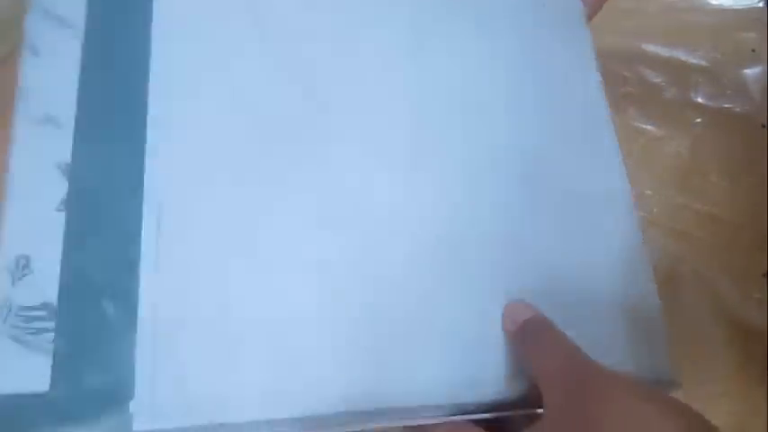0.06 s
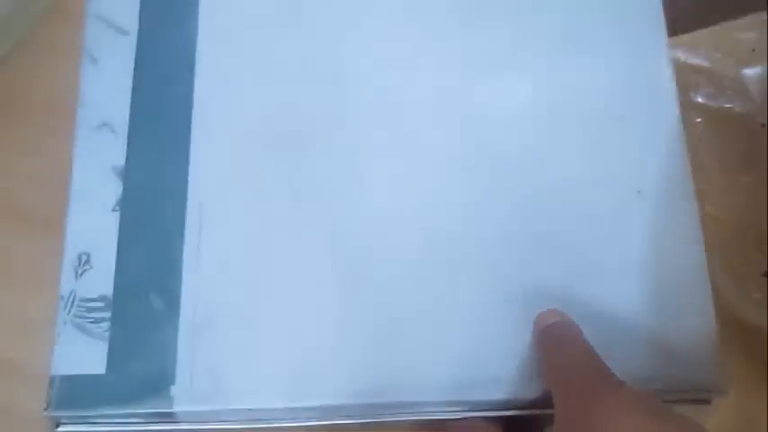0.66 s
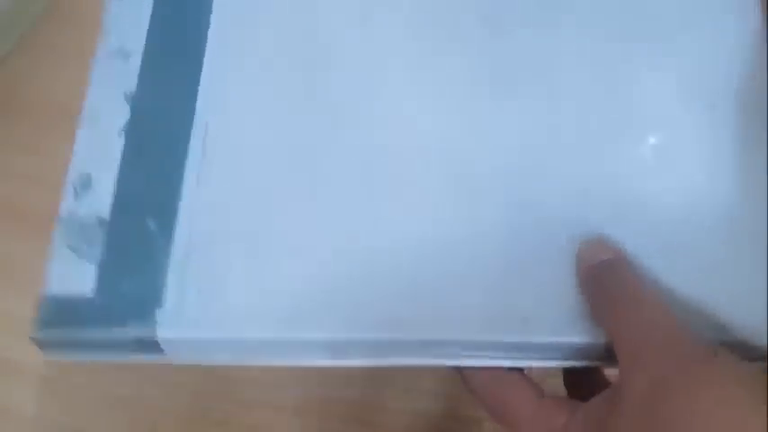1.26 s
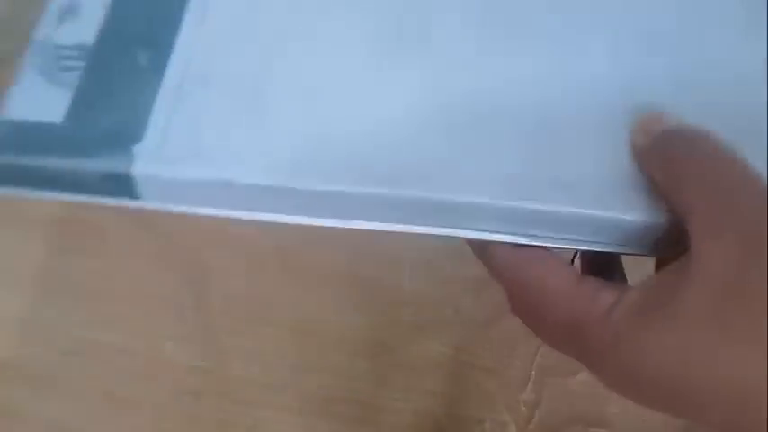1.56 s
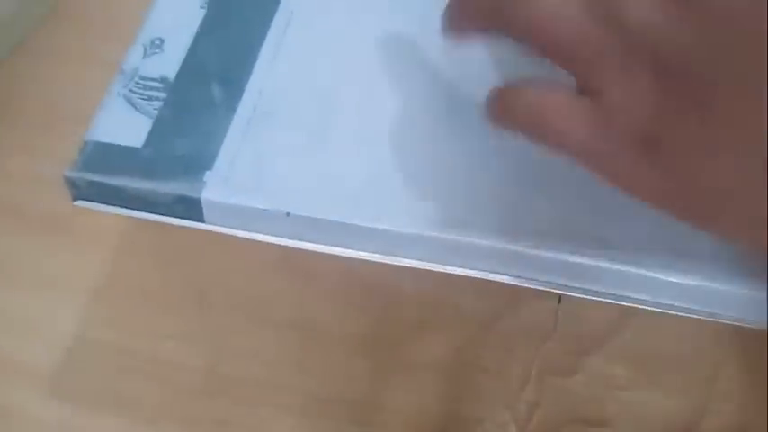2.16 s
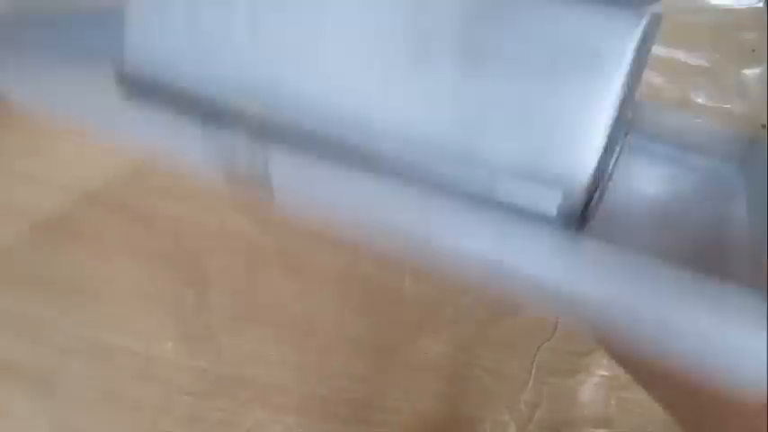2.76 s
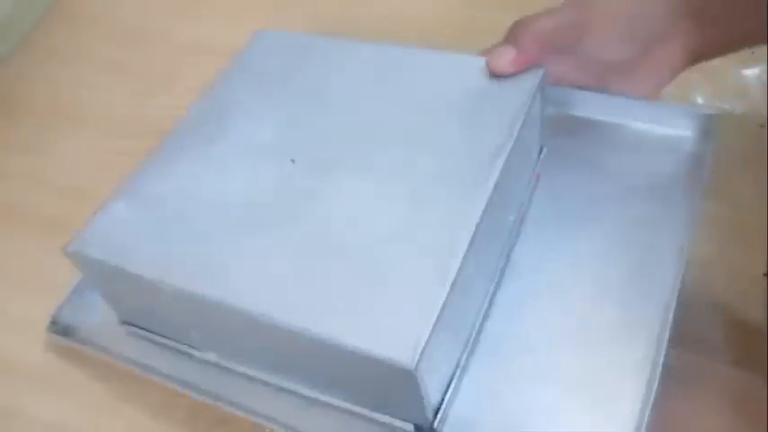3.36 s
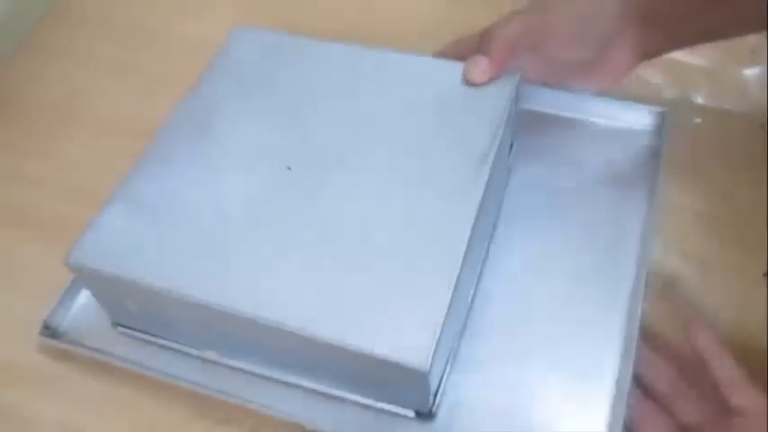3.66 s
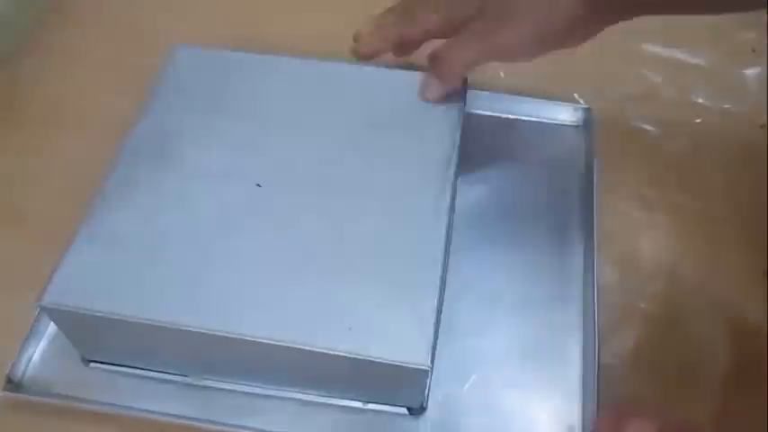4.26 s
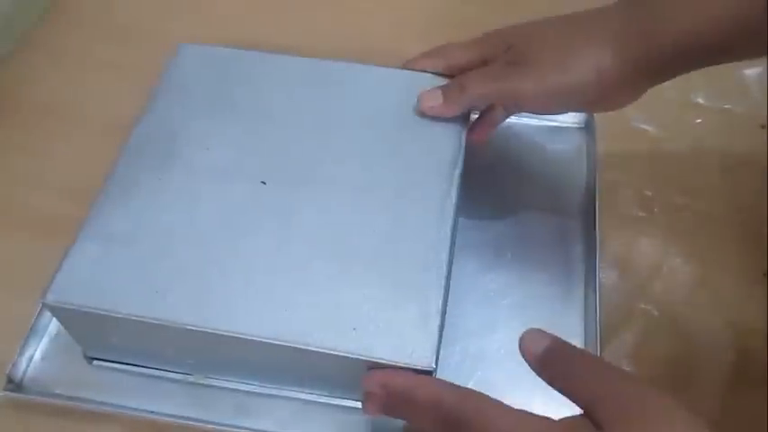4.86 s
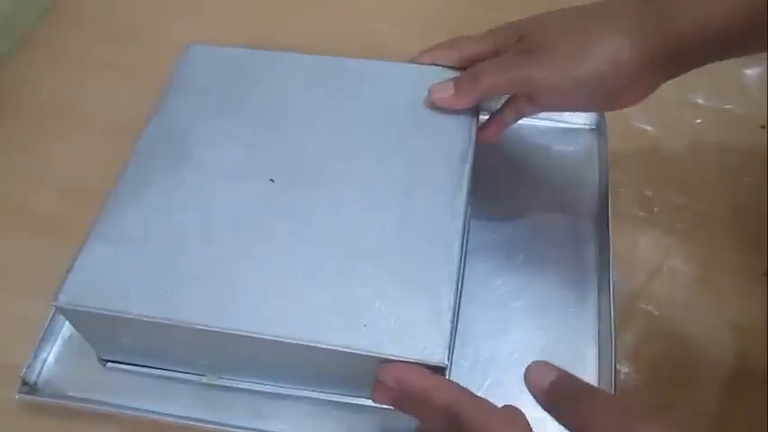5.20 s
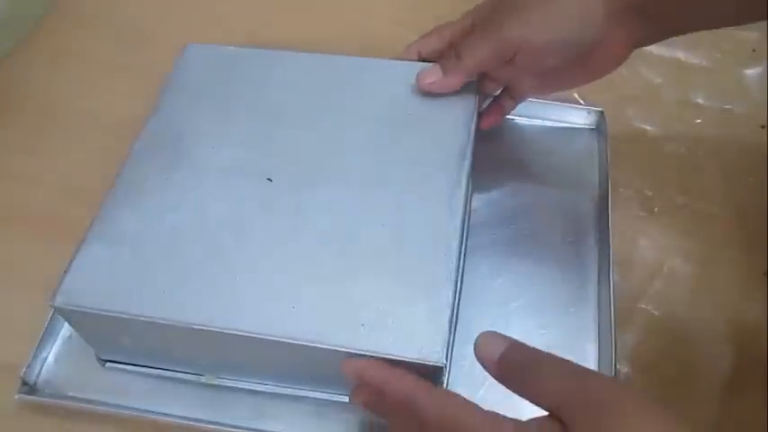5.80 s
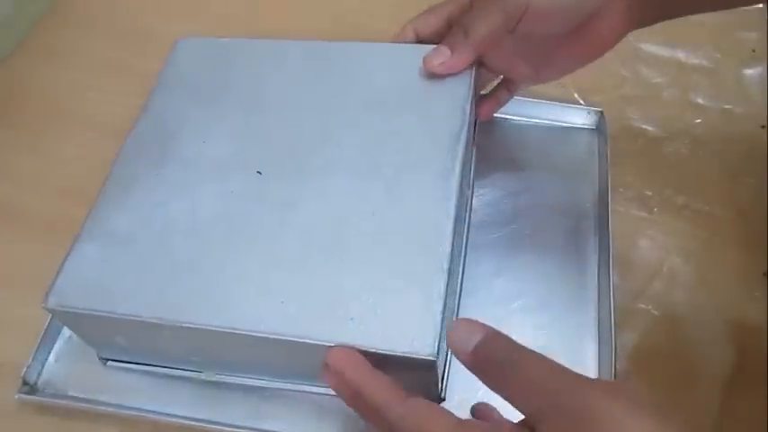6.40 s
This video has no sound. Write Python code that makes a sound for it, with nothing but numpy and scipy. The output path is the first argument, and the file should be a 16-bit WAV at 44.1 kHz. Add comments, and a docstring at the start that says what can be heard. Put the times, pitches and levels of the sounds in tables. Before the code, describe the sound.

Close knocks, clatter and scraping of an aluminium tin being turned over onto a metal tray, with a low hum behind.

```python
"""Baking tin on a tray

An aluminium baking tin is handled on a thin tray, turned over and set down on it, on a kitchen table.
Close to the microphone, the sheet metal clanks and rattles when knocked, booms when pushed and scrapes
as it slides, over the low hum of the room. A limiter ducks on the loudest knocks and lets the hum
creep back."""
import sys
import numpy as np
from scipy import signal
from scipy.fft import rfft, irfft
from scipy.io import wavfile
from scipy.ndimage import uniform_filter1d

SR = 44100
rng = np.random.default_rng(int(sys.argv[2]) if len(sys.argv) > 2 else 0)


def transcribe(signal):
    """Save signal, clipped to [-1, 1], as a 16-bit WAV file at the path in sys.argv[1]."""
    frames = np.atleast_2d(signal).T
    limited = np.clip(frames, -1, 1)
    pcm = np.round(limited * 32767).astype(np.int16)
    wavfile.write(sys.argv[1], SR, pcm)


N = 292824
TIME = np.arange(N) / SR
HELD_T60_S = .25  # in the hands the sheet rings freely

# The ring of tin and tray. Each row: mode in Hz, relative level in dB, t60 in seconds before damping.
SHEET_MODES = [(164, 9, 0.38), (217.2, 3, 0.24), (282, -3.5, 0.61), (340.2, -4.5, 1), (431.4, -0.5, 1),
               (473.7, -5, 0.33), (504.4, 4.5, 0.24), (545, -2, 0.29), (609.5, 2, 0.23), (728, 0.5, 0.47),
               (796, -7, 0.35), (884, -19, 0.25), (1132, -3.5, 0.27), (1207, 0, 0.21), (1302, -2.5, 0.2),
               (1410, 5, 0.089), (1600, 7, 0.1), (1600, -5, 0.053), (1752, -11.5, 0.23), (1900, -15, 0.17)]
# The ping of the folded rim. Each row: mode in Hz, relative level in dB, t60 in seconds before damping.
RIM_MODES = [(2380, -8, 0.38), (2660, 1, 0.36), (2750, -18.5, 0.27), (3200, -34, 0.26), (3270, 8, .25),
             (3860, 9, 0.7), (4340, -16, 0.15), (4460, -14, 0.13), (5300, 7, 0.18), (6400, 2, 0.18),
             (7850, -12, 0.14)]
# The bright tone of an edge contact. Each row: frequency in Hz, relative level in dB.
CLICK_SPECTRUM = [(600, -11), (1500, 6.5), (2500, -0.5), (4000, 0.5), (5500, -5.5), (8000, -6),
                  (10500, -13), (13500, -15.5), (16000, -59)]
# The dull tone of rubbed sheet. Each row: frequency in Hz, relative level in dB.
RUB_SPECTRUM = [(25, -8), (55, 6), (85, -6), (160, 1), (270, 0), (480, 3.5), (750, 3), (1000, -3.5),
                (1500, -19), (2200, -20), (5000, -107)]


def amp(db):
    """Decibels as a gain."""
    return 10 ** (np.asarray(db) / 20)


def unit(x):
    """Scales x to rms 1."""
    return x / np.sqrt(np.mean(x ** 2) + 1e-20)


def curve_at(points, hz):
    """Reads a curve along a log frequency axis."""
    f, value = np.transpose(points)
    return np.interp(np.log(hz + 1), np.log(f + 1), value)


def add(mix, start_s, sound):
    """Lays a sound into the mix."""
    part = mix[max(round(start_s * SR), 0):][:len(sound)]
    part += sound[:len(part)]


def hump(hz, centre_hz, octaves):
    """A bell of gain, halved this many octaves from its centre."""
    return 1 / (1 + (np.log2((hz + 1) / centre_hz) / octaves) ** 2)


def colour(x, points, centre_hz=None, octaves=1):
    """Gives x a spectrum, and if asked a broad hump around one frequency; rms 1."""
    hz = np.fft.rfftfreq(len(x), 1 / SR)
    gain = amp(curve_at(points, hz))
    if centre_hz:
        gain = gain * hump(hz, centre_hz, octaves)
    return unit(irfft(rfft(x) * gain, len(x)))


def wander(below_hz):
    """Smooth random drift of rms 1."""
    hz = np.fft.rfftfreq(N, 1 / SR)
    return unit(irfft(rfft(rng.standard_normal(N)) * (hz < below_hz), N))


def decay(t, t60):
    """A fade of 60 dB every t60 seconds."""
    return np.exp(-np.log(1000) * t / np.maximum(t60, 1e-3))


def struck(x, db, first_s):
    """Sets the rms level of the first moments of a blow."""
    return x * amp(db) / np.sqrt(np.mean(x[:int(first_s * SR) + 1] ** 2) + 1e-20)


def swells(starts, rises, lengths, levels_db, t60):
    """Gain of a series of movements: each eases in, holds and dies away."""
    power = np.zeros(N)
    for start, rise_s, length, db in np.broadcast(starts, rises, lengths, levels_db):
        rise = np.sin(np.pi / 2 * np.clip((TIME - start) / rise_s, 0, 1)) ** 2
        power += (amp(db) * rise * decay(np.maximum(TIME - start - length, 0), t60)) ** 2
    return np.sqrt(power)


def ring(t, modes, damping_t60, centre_hz=None, octaves=1, uneven_db=3.0, detune=0.02):
    """Modes rung by one blow; the spot struck sets their shares, the grip bends and damps them."""
    hz, db, t60 = np.transpose(modes)[:, :, None]
    share, bend, phase = rng.standard_normal((3, len(modes), 1))
    gain = amp(db + uneven_db * share) * (hump(hz, centre_hz, octaves) if centre_hz else 1)
    waves = gain * np.sin(2 * np.pi * (hz * (1 + detune * bend) * t + phase)) * decay(t, t60)
    return waves.sum(0) * decay(t, damping_t60) / np.sqrt(np.sum(gain ** 2) / 2)


def room_hum(air_db=-35.5):
    """A bed of room noise with the wavering tones of a running appliance."""
    # The low wash of the room. Each row: frequency in Hz, relative level in dB.
    air_spectrum = [(20, -1.5), (45, -5), (75, -4.5), (115, -1.5), (165, -2.5), (210, -2), (290, -12),
                    (560, -12.5), (760, -19.5), (1080, -17.5), (1400, -24), (2100, -24.5), (4000, -33),
                    (8500, -39), (12000, -46), (16000, -55)]
    # The appliance's tones. Each row: pitch in Hz, rms level in dB around which it wavers.
    hum_tones = [(151, -44), (178, -52.5), (247, -57.5), (344, -50.5), (539, -52.5), (597, -54.5),
                 (1044, -55.5), (1168, -61.5), (11795, -79)]
    air = amp(air_db) * colour(rng.standard_normal(N), air_spectrum) * amp(0.19 * wander(1.7))
    tones = np.zeros(N)
    for hz, db in hum_tones:
        level = amp(db) * (1 + 0.36 * wander(6.8))
        tones += level * np.sin(2 * np.pi * hz * TIME + 1.16 * wander(9))
    return air + np.sqrt(2) * tones


def catches(per_s, spread_db, fade):
    """Grains catch at random: spikes of uneven strength, each dying along the fade."""
    spikes = (rng.random(N) < per_s / SR) * amp(spread_db * np.minimum(rng.exponential(1, N), 3))
    return signal.fftconvolve(spikes, fade)[:N]


def scrape(rim_db=-22, tick_db=-24, release_t60=0.3):
    """Tiny slips drive the sheet's resonances and hiss at the contact; catching grains tick the rim."""
    # Metal slides on metal and under the hands. Each row: start, rise and length in seconds,
    # sheet level in dB, hiss level in dB.
    strokes = [(.0, 0.017, 0.31, -39.5, -46.5), (0.745, 0.03, 0.27, -35.5, -48.5),
               (1.232, 0.051, 0.16, -32, -69), (2.387, 0.05, 0.096, -34, -67),
               (2.486, 0.044, 0.17, -27.5, -29), (3.107, 0.12, 0.15, -19.5, -21.5),
               (3.32, 0.032, .2, -20, -36.5), (3.554, 0.028, 0.11, -48, -36.5),
               (3.675, 0.085, 0.18, -28, -40), (3.87, 0.073, 0.1, -32.5, -41.5),
               (3.997, 0.6, 0.15, -58, -16)]
    starts, rises, lengths, sheet_db, hiss_db = np.transpose(strokes)
    t = np.arange(SR // 3) / SR
    grit = catches(per_s=70, spread_db=1.13, fade=decay(t[:SR // 50], 0.0063))
    slips = rng.standard_normal(N) * (amp(0.68 * wander(280) + 1.7 * wander(25)) + 0.47 * grit)
    sheet_ring = ring(t, SHEET_MODES, 0.13, centre_hz=930, octaves=0.64, uneven_db=8.0, detune=0.0012)
    rim_ring = ring(t, RIM_MODES, 0.17, uneven_db=-2.0, detune=0.0024)
    singing = unit(signal.fftconvolve(slips, sheet_ring)[:N])
    rim = unit(signal.fftconvolve(slips, rim_ring)[:N])
    snags = catches(per_s=45, spread_db=3, fade=decay(t, 0.03))
    ticks = colour(rng.standard_normal(N) * snags, CLICK_SPECTRUM)
    sheet = unit(colour(slips, RUB_SPECTRUM) + amp(-9) * singing) + amp(rim_db) * rim + amp(tick_db) * ticks
    # The bright top of the slide. Each row: frequency in Hz, relative level in dB.
    hiss_spectrum = [(500, -1), (1500, 5), (2500, 0.5), (4200, 0), (6000, -4.5), (8000, -5), (10500, -11.5),
                     (13500, -13), (16000, -24)]
    return (sheet * swells(starts, rises, lengths, sheet_db, release_t60)
            + colour(slips, hiss_spectrum) * swells(starts, rises, lengths, hiss_db, release_t60))


def tray_sway(hz=54, octave_db=-12, rise_s=0.037, release_t60=0.22):
    """The wide tray flaps in its lowest mode; the bent sheet adds the octave."""
    # Jolts and changes of grip. Each row: start in seconds, length in seconds, level in dB.
    jolts = [(0.046, 0.12, -19.5), (0.657, 0.036, -19.5), (0.771, 0.11, -25), (0.982, 0.18, -32),
             (3.318, 0.035, -12), (3.544, .06, -20), (3.78, 0.12, -36), (5.68, 0.032, -32),
             (6.357, .05, -33.5)]
    starts, lengths, levels_db = np.transpose(jolts)
    phase = 2 * np.pi * hz * TIME + .5 * wander(6)
    flap = unit(np.sin(phase) + amp(octave_db) * np.sin(2 * phase + wander(6)))
    return swells(starts, rise_s, lengths, levels_db, release_t60) * flap


def edge_click(t, t60, attack_s):
    """The first contact is sharp; the loose rim then buzzes unevenly while the sheet moves."""
    noise, slack = rng.standard_normal((2, len(t)))
    chatter = amp(3.7 * unit(uniform_filter1d(slack, size=110)))
    click = colour(noise, CLICK_SPECTRUM) * (decay(t, 0.028) + amp(-6.5) * chatter * decay(t, 0.8 * t60))
    ping = amp(-11.5) * ring(t, RIM_MODES, 0.73 * t60, detune=0.0016)
    return (click + ping) * (1 - decay(t, 0.73 * attack_s))


def knock(clank_db, centre_hz, thump_db, click_db, t60, attack_s):
    """One blow: the sheet clanks, its flat bottom thumps, and the rim clicks and chatters."""
    # The clank's body and the thump's weight. Each row: frequency in Hz, relative level in dB.
    clank_spectrum = [(100, -21), (200, -4.5), (450, 3), (750, 0.5), (1000, -3), (1500, -8.5), (2000, -9),
                      (3000, -9.5), (6000, -11)]
    thump_spectrum = [(15, -18), (30, 1), (55, 8), (80, -20), (130, 0.5), (220, 6), (400, -14), (1000, -89)]
    # The wide bottom flexes. Each row: mode in Hz, relative level in dB, t60 in seconds before damping.
    flex_modes = [(54.8, 1, 1), (102.2, -3, 0.54), (171, 0.5, 0.24)]
    t = np.arange(SR // 2) / SR
    clank_noise, thump_noise = rng.standard_normal((2, len(t)))
    # a few strong modes stand out of the dense ring of the thin sheet
    dense = colour(clank_noise, clank_spectrum, centre_hz, octaves=0.83) * decay(t, t60)
    clank = dense + amp(-3) * ring(t, SHEET_MODES, 2.2 * t60, centre_hz, detune=.004)
    thump = colour(thump_noise, thump_spectrum) * decay(t, 0.11) + amp(-7.5) * ring(t, flex_modes, 0.49)
    return (struck(clank * (1 - decay(t, attack_s)), clank_db, first_s=0.014)
            + struck(thump * (1 - decay(t, 0.056)), thump_db, first_s=0.059)
            + struck(edge_click(t, t60, attack_s), click_db, first_s=0.006))


def clatter(rebounds=4, gap_s=.026, scatter=.25, rebound_attack_s=0.0021):
    """Tin and tray knock together in the hands, and the loose tin rattles on in fading rebounds."""
    # Each row is a knock: start in seconds, clank in dB, clank centre in Hz, thump in dB, click in dB,
    # clank attack in seconds, gain of the rebounds in dB.
    knocks = [(.089, -18, 696, -21.5, -28.5, 0.017, -3), (.36, -6.5, 846, -27.5, -13, 0.0012, 2.5),
              (.648, -25, 624, -37, -35, 0.027, -14), (.664, -13, 640, -25.5, -25, 0.0054, -28),
              (.682, -12, 634, -33, -21, 0.0031, -13), (.866, -16, 670, -24.5, -27.5, 0.064, 2),
              (1.03, -25.5, 576, -32.5, -35, 0.0042, 1), (1.269, -25.5, 465, -42, -37.5, 0.023, -0.5),
              (1.35, -24.5, 685, -37.5, -31, 0.0014, 4), (1.635, -27, 400, -30, -35, 0.0033, -8),
              (1.667, -14, 617, -24, -19.5, 0.004, -10), (1.674, -15.5, 630, -34, -19.5, 0.0031, -3),
              (1.712, -20.5, 643, -42, -22, .004, -5), (2.305, -16, 516, -31, -23, 0.033, 2),
              (2.439, -27, 600, -46, -32.5, .003, -28)]
    out = np.zeros(N)
    for start, clank_db, centre_hz, thump_db, click_db, attack_s, rebound_db in knocks:
        add(out, start, knock(clank_db, centre_hz, thump_db, click_db, HELD_T60_S, attack_s))
        gaps = gap_s * np.exp(scatter * rng.standard_normal(rebounds))
        for delay in np.cumsum(gaps):
            slow_drop, fast_drop = 164 * delay, 231 * delay  # rates in dB per second
            rebound = knock(clank_db - slow_drop, centre_hz, thump_db - fast_drop, click_db - fast_drop,
                            HELD_T60_S, rebound_attack_s)
            add(out, start + delay, amp(rebound_db) * rebound)
    return out


def hollow_bonks():
    """Soft, broad pushes ring the low modes of the closed tin, with a dull shudder of the sheet."""
    # Pushes on the flat. Each row: start in seconds, level in dB, centre in Hz, damping t60 in seconds.
    pushes = [(0.096, -17, 33, .3), (0.132, -14.5, 150, .3), (1.167, -28.5, 286, 0.86),
              (1.638, -29, 262.4, 0.36), (2.302, -19, 228, 0.21), (2.633, -12, 390, 0.1),
              (4.337, -10, 409, 0.2), (4.365, -11, 197, 0.12), (4.384, -11, 380, 0.066),
              (4.414, -18, 170, 0.75), (4.462, -20, 330, 0.43), (4.825, -38.5, 318, 0.26)]
    # The upturned tin with air shut under it. Each row: mode in Hz, relative level in dB,
    # t60 in seconds before damping.
    hollow_modes = [(40, 19, 0.94), (110, 7.5, 0.87), (152, -5.5, 0.41), (213.4, 0, 0.53), (339, 2, 0.91),
                    (402.4, -0.5, 0.85), (452.5, -1, 0.39), (550, 1, 0.46), (802, -8.5, 0.3),
                    (945, -7.5, .3), (1070, -13, 0.51)]
    out, t = np.zeros(N), np.arange(SR // 2) / SR
    soft_attack = (1 - decay(t, .012)) ** 2
    for start, db, centre_hz, t60 in pushes:
        boom = ring(t, hollow_modes, t60, centre_hz, uneven_db=2.0, detune=0.0074)
        noise = rng.standard_normal(len(t))
        shudder = colour(noise, RUB_SPECTRUM, centre_hz, octaves=0.4) * decay(t, 1.05 * t60)
        add(out, start, struck((boom + amp(-9.5) * shudder) * soft_attack, db, first_s=0.0075))
    return out


def rim_ticks(sheet_db=-5):
    """The rim touches lightly: a crisp tick that only just stirs the sheet."""
    # Each row is a touch: start in seconds, level in dB.
    touches = [(.456, -30), (.528, -33.5), (.801, -37), (1.099, -35.5), (1.305, -38), (1.382, -44),
               (1.404, -33.5), (1.481, -41), (1.93, -43), (2.334, -22), (3.812, -33.5), (3.95, -36.5)]
    out, t = np.zeros(N), np.arange(SR // 4) / SR
    for start, db in touches:
        tick = struck(edge_click(t, t60=.09, attack_s=.003), db, first_s=.006)
        add(out, start, tick + amp(db + sheet_db) * ring(t, SHEET_MODES, HELD_T60_S, centre_hz=800))
    return out


def landings():
    """The metal comes down in single blows, cut short by the firm support it meets."""
    # Each row is a blow: start in seconds, clank in dB, clank centre in Hz, thump in dB, click in dB,
    # clank attack in seconds, t60 of the dense ring in seconds.
    blows = [(2.632, -1.5, 520, -26, -3.5, 0.00075, 0.066), (3.279, -6, 650, -20, -36, 0.0034, 0.13),
             (3.313, -3, 680, -27, -21, 0.0068, 0.15), (3.326, -3.5, 820, -29, -13.5, 0.0021, 0.091),
             (3.425, -10, 705, -29, -34, 0.0035, 0.055), (3.468, -4, 484, -23, -28, 0.0016, 0.021),
             (3.548, -1.5, 586, -17.5, -21, 0.015, 0.087), (3.797, -23.5, 950, -32, -31, 0.0049, 0.071),
             (4.315, -33.5, 410, -29, -35.5, .003, 0.27), (4.341, -26.5, 805, -18, -36.5, 0.048, 0.49),
             (4.364, -21, 1630, -18, -18.5, 0.0025, 0.19)]
    out = np.zeros(N)
    for start, clank_db, centre_hz, thump_db, click_db, attack_s, t60 in blows:
        add(out, start, knock(clank_db, centre_hz, thump_db, click_db, t60, attack_s))
    return out


def kitchen_reverb(x, wash_above_hz=3000):
    """Sparse reflections, each band dying at its own speed; the treble scatters into a smooth wash."""
    # The kitchen's short tail. Each row: frequency in Hz, t60 in seconds.
    decay_times = [(100, 0.53), (600, 0.33), (3000, 0.29), (8000, 0.32), (15000, 0.22)]
    taps = rng.choice([-1., 1.], SR // 2) * (rng.random(SR // 2) < .08)
    taps[:int(.005 * SR)] = 0  # pre-delay
    hz, t, bands = signal.stft(taps, SR, nperseg=256)
    tail = signal.istft(bands * decay(t, curve_at(decay_times, hz)[:, None]), SR, nperseg=256)[1]
    wet = signal.fftconvolve(x, tail / np.linalg.norm(tail))[:N]
    hz, t, bands = signal.stft(wet, SR, nperseg=256)
    smeared = np.sqrt(abs(uniform_filter1d(abs(bands) ** 2, size=11, axis=0)))
    wash = np.sqrt(2) * smeared * np.exp(2j * np.pi * rng.random(bands.shape))
    return signal.istft(np.where(hz[:, None] > wash_above_hz, wash, bands), SR, nperseg=256)[1][:N]


def scene():
    """The metal close by, its echo in the kitchen, and the hum behind."""
    metal = clatter() + rim_ticks() + landings() + hollow_bonks() + scrape()
    return (metal + amp(-11.0) * kitchen_reverb(metal) + tray_sway() + room_hum())[None]


def lag(x, time_s):
    """Follows x smoothly, like a charging capacitor."""
    pole = np.exp(-1 / (time_s * SR))
    return signal.lfilter([1 - pole], [1, -pole], x)


def record(dry, threshold_db=-9.5, recovery_db_per_s=4.5, sense_s=0.008, attack_s=0.00094, cut_hz=15900):
    """A limiter ducks just after a loud knock begins and recovers slowly; then clipping and a top cut."""
    power_db = 10 * np.log10(lag(dry[0] ** 2, sense_s) + 1e-12)
    recovery_db = TIME * recovery_db_per_s
    held_db = np.maximum.accumulate(power_db + recovery_db) - recovery_db
    duck_db = lag(np.maximum(held_db - threshold_db, 0), attack_s)
    limited = np.clip(dry / amp(duck_db), -1, 1)
    lowpass = signal.firwin(255, cut_hz, window=("kaiser", 8), fs=SR)
    return signal.oaconvolve(limited, lowpass[None], "same")


dry = scene()
out = record(dry)
transcribe(out)
```